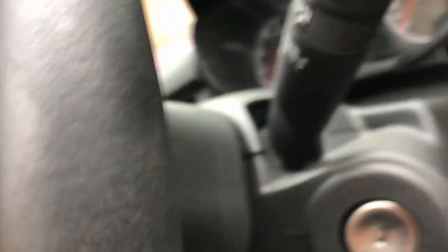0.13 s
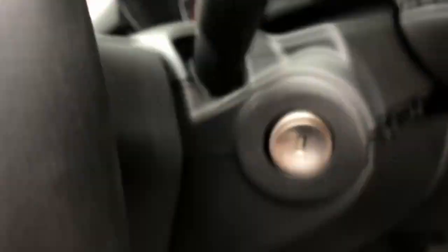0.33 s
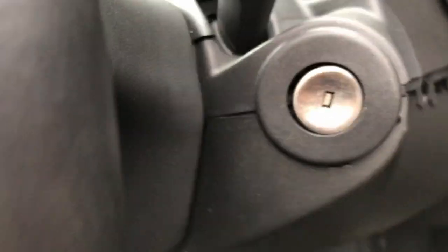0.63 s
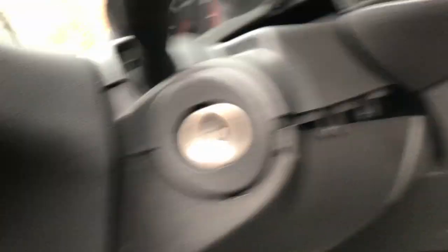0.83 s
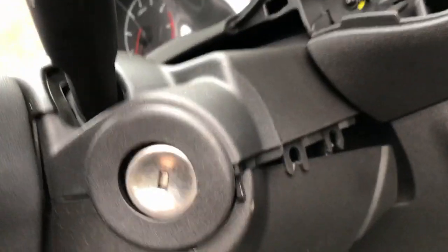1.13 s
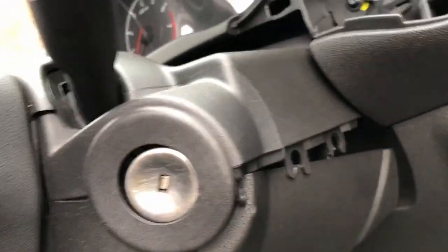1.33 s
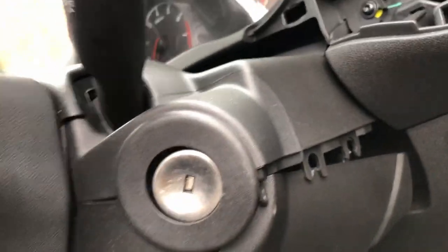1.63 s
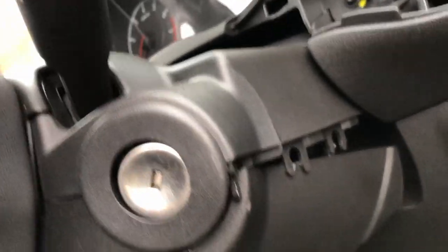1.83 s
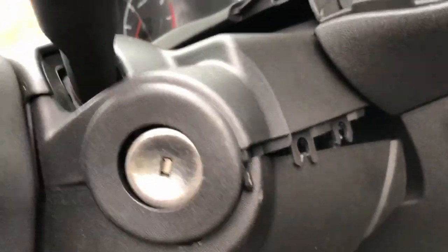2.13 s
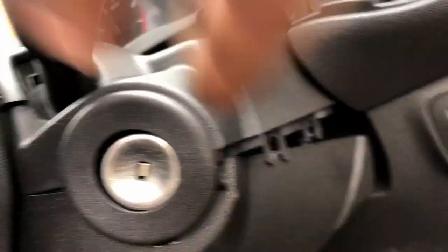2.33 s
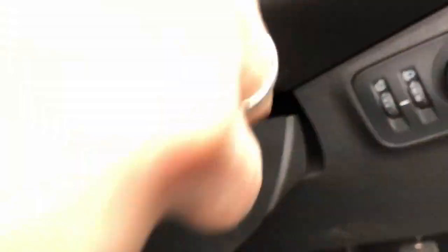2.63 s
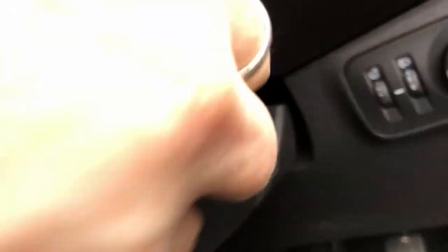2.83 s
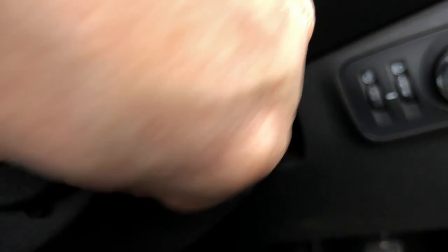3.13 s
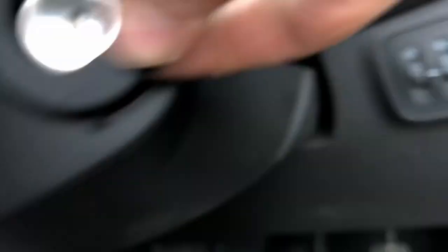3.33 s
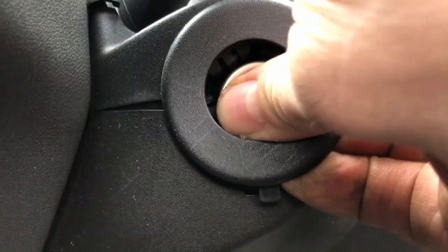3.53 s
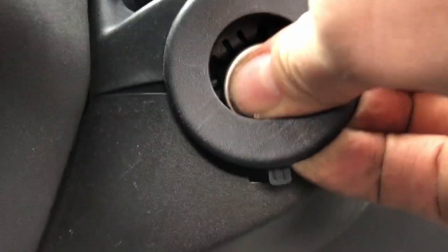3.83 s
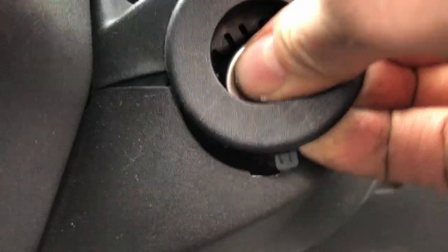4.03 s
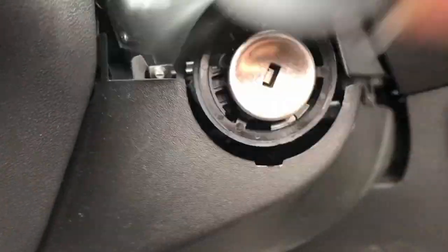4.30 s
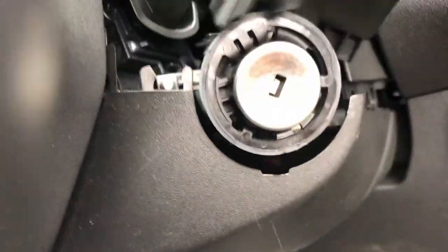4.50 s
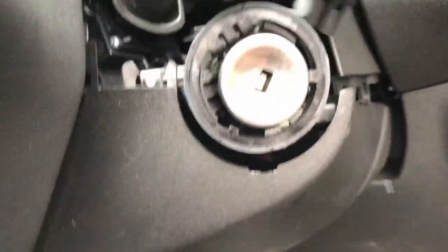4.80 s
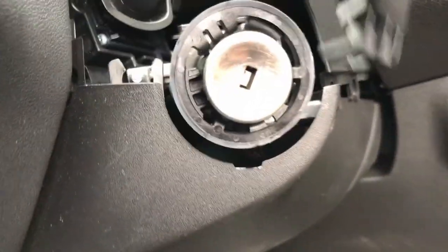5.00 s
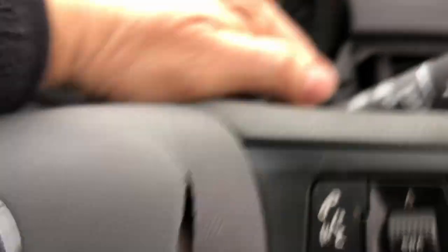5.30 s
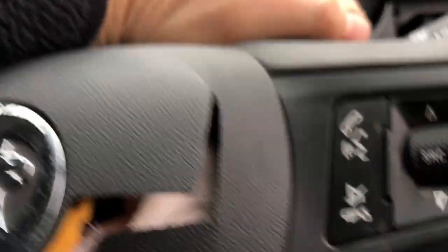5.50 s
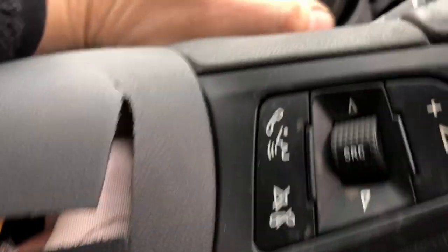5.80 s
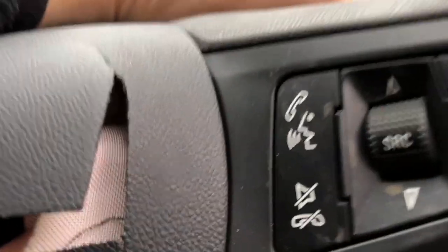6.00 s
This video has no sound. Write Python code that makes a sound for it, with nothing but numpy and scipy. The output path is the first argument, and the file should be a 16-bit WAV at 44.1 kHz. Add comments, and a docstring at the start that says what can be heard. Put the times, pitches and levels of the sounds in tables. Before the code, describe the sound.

Inside a parked car, plastic trim rubs, bounces and snaps off the steering column in sharp close clacks, ending in heavy hollow knocks.

```python
"""Inside a parked car, a hand prises the plastic bezel off the ignition lock and lifts the column shroud.
Catches snap and loose panels knock: each blow is a chirping bending wave with modes, rattle and cabin boom.
Fingers, sleeve and panel edges rub as shaped slip noise; narrow bands of it give short rubs and low hums.
Tugs shudder as a low sine, a thin whine is tinted noise.
The close hand-held microphone adds grip bumps and overloads on the hardest snaps."""
import sys
import numpy as np
from scipy import signal
from scipy.fft import rfft, irfft
from scipy.io import wavfile
from scipy.ndimage import uniform_filter1d

SR = 44100
rng = np.random.default_rng(int(sys.argv[2]) if len(sys.argv) > 2 else 0)


def int16_out(signal):
    """Quantize to a 16-bit WAV file."""
    q = np.round(np.clip(np.atleast_2d(signal).T, -1, 1) * 32767)
    wavfile.write(sys.argv[1], SR, q.astype(np.int16))


N = 271215  # samples

# Still cabin air: f/Hz, level/dB
AIR_COLOUR = [(20, -16), (40, -11.5), (68, 7.5), (100, -5.5), (170, -10.5), (300, -18.5), (700, -19),
              (1500, -26.5), (4000, -37), (9000, -41), (16000, -45)]
AIR_RMS_DB = -53.5

# Hand strokes over trim: t of firmest moment/s, swell/s, release/s, fingers before trim gain/dB, sleeve likewise/dB
STROKES = [(0, .05, 0.13605, -58, -63), (.227, .02, .08, -43.5, -56), (.41, 0.04425, 0.074, -48.5, -48.5),
           (0.596, 0.095, 0.043, -49.5, -45.5), (0.778, 0.15, 0.073, -51, -50),
           (.83, 0.12, 0.031, -62.5, -48.5), (1.05, 0.26, 0.39, -59.5, -59), (1.42, .3, .4, -70, -66.5),
           (1.852, 0.2276, 0.0438, -62.5, -51.5), (1.99, .2, 0.2, -67, -59), (2.4, 0.21, 0.22, -64, -58),
           (2.52, 0.14, 0.19, -50, -51), (2.609, 0.063, 0.082, -47.5, -46), (2.72, 0.29, 0.14, -47, -53.5),
           (2.851, 0.03413, .12, -47, -56), (3.02, 0.08724, 0.65, -50.5, -55),
           (3.254, 0.041, 0.11, -46, -46.5), (3.386, 0.14455, 0.08, -47.5, -40.5),
           (3.47, 0.11, 0.024, -71, -54), (3.68, 0.045, 0.26, -51.5, -68.5), (3.92, 0.15, 0.17, -58, -65.5),
           (4.16, 0.13865, .25, -53, -66.5), (4.48, 0.39, 0.46, -51, -51), (4.63, 0.18, 0.11, -62.5, -61),
           (5.299, 0.02076, 0.33, -47, -54), (5.619, 0.13, .25, -48.5, -53.5),
           (5.93, 0.10133, 0.1412, -51.5, -50.5), (6.07, 0.13, 0.1398, -48, -44)]
# Fingers on hollow trim, sleeve hiss: f/Hz, level/dB
FINGER_COLOUR = [(60, -6), (170, 7), (330, 0), (470, -1), (560, 8), (700, 0), (920, 1), (1300, -6.5),
                 (2200, -14), (5000, -48.5)]
SLEEVE_COLOUR = [(300, -14.5), (1000, 6), (2500, 4), (4500, 5), (7500, 0.5), (10000, -4), (13000, -13.5),
                 (16000, -21)]
STROKE_DROP_DB, STROKE_SHAPE = 21, 1.15  # fall over one swell or release time; roundness of the top
REST_FINGERS_DB, REST_SLEEVE_DB = -74.5, -73  # floor between strokes, before trim gain

# Dry panel-edge scrapes, then short narrow-band rubs and low hums (127 Hz at 3.08 s is cabin boom):
# t/s, length/s, rms before taper/dB, resonance f/Hz
SCRAPES = [(.214, 0.028, -52, 3561), (.265, 0.032, -56.5, 3754), (.527, 0.095, -48.5, 1283),
           (.748, 0.052, -40, 9140), (1.276, 0.029, -52.5, 6760), (2.002, 0.02474, -42.5, 1357),
           (2.073, .026, -42, 1080), (4.35, .059, -18.5, 702), (4.433, 0.011, -28.5, 2291)]
NARROW_RUBS = [(2.59, .12, -47, 582), (2.69, .07, -51, 920), (2.831, 0.04472, -46.5, 594),
               (2.99, .025, -49, 550), (3.08, 0.12, -43.5, 127.5), (3.186, 0.04, -50.5, 580),
               (3.35, 0.06172, -48, 1013), (3.496, 0.041, -52, 192), (3.655, .092, -54, 526),
               (3.697, 0.12028, -53, 239.9)]
# Slip noise of both: f/Hz, level/dB
SCRAPE_COLOUR = [(150, 4.5), (500, 1.5), (1000, 2), (1450, 1), (2200, -4.5), (4000, -0.5), (6500, -4),
                 (10000, -13), (16000, -22)]
SCRAPE_Q, SCRAPE_RING_DB = 5.5, 14.5
NARROW_WIDTH_HZ, NARROW_RING_DB = 65, 31.5
SCRAPE_BASS_RATIO = 6  # bass is cut this many times below the resonance

# Blows, for each part in turn: t/s, relative strength/dB, hardness/dB per octave above PIVOT_HZ,
# weight/dB per octave below it, ring t60 at 1 kHz/s
RIM_TAPS = [(.345, -12, 6, 6, .022), (2.0572, 14, -7, -1.5, 0.024), (2.0735, 0, 3, 0, 0.033),
            (4.4675, 15, -5, -4, 0.025), (4.476, -10, 10, 10, 0.039), (5.0235, 10.5, 3.5, 3.5, 0.042),
            (5.324, 15.5, -7.5, -0.5, 0.031), (5.419, 0, 5, 2, 0.076), (5.51, 1, -9, -3.5, 0.0315),
            (5.557, 13, -4, 0.5, 0.052), (5.583, 0.5, 4.5, 2.5, 0.18), (5.684, 1.5, 4, 4, 0.058),
            (5.731, 0, 1, 4.5, .04), (6.0312, 19, -4, 0.5, 0.034), (6.0958, 32, 4, -15, 0.059)]  # stiff shroud rim clacks on its seat
GRIP_BUMPS = [(0.358, -28, 1.2, 7.5, 0.031), (0.411, -10.5, -1.0, 3.4, 0.02666),
              (0.604, -13, 7, 0.4, 0.0386), (0.751, 5, 1.9, -5, 0.057), (0.847, -0.1674, -3, -1.5, 0.00796)]  # grip shifts on the microphone body
COVER_BOUNCES = [(1.1615, 10.5, 2.5, 0, 0.089), (1.189, 32, -1.3, -4.5, .031), (1.2045, 14, 3, -0.5, 0.056),
                 (1.357, 8.5, -1.5, .5, 0.028), (1.365, 10.5, -1, -3.6, 0.05),
                 (1.3925, 15, -1, -1.5, 0.028), (1.444, 6.5, -2.5, 0, 0.046), (1.504, 2.5, -3, 0.5, 0.027),
                 (1.518, -0.5, -2.5, 1, 0.039), (1.557, -4, 0, 1.3, .045), (1.592, -6, -2, 1, .025),
                 (1.623, -17.5, 2, 4.5, 0.089)]  # loose upper cover drops back and bounces to rest
BEZEL_SNAPS = [(2.489, -3.2, 0.7, 5, 0.1), (2.917, -4.5, -3.5, 1, 0.032), (2.998, -4, -8.5, 3.1, 0.064),
               (3.039, 3, -1.4478, 0.5, 0.084), (3.845, -6, -1.4, 5.5, 0.024), (3.977, -4, -4, -0.5, 0.099),
               (4.2405, 31, -4.5, -2.5, 0.039), (4.3115, 9.5, 0.4, -5.5, 0.327),
               (4.3348, 30, 3, -6.5, 0.031), (4.352, 20.5, 2.4, 0.5, 0.0734),
               (4.357, 34.5, -2.5, -0.5, 0.058), (4.3748, 15, 6.5, -1, 0.0085),
               (4.381, 20.5, 3.9, 1.5, 0.019), (4.3915, 14.5, 5, 0, 0.031), (4.3983, 28.5, 2, -9, 0.021)]  # bezel strains, lets go all round, scrapes off the lock
CATCH_SNAPS = [(3.0618, 31, -1.0, -5.5, 0.034), (3.2735, 0.1, 0.9, 3.5, 0.044)]  # stiff catch under the bezel is levered free, ticks once more
SHROUD_KNOCKS = [(4.418, 16.2, -3.4, -5, 0.11), (5.7815, 7.7, 2.265, -3, 0.063), (5.7875, 21, 1.8, -2, 0.1),
                 (5.8005, 29, 0.38, 0.5, 0.073), (6.1092, 32.857, -0.76, -1, 0.1),
                 (6.1335, 30.7, -1.2, -12.5, .19)]  # shroud halves knock together and pull apart
CLIP_TICKS = [(4.562, 7, -4, 2.4, 0.065), (4.595, -1.5, -3.2, 3, 0.075), (4.7693, 17, 1.25, -3.5, 0.026),
              (4.8415, 0.5, 7.5, 7, 0.038), (4.8585, -17.5, 10, -4, 0.027), (4.866, -5.3, 3.5, 2.5, 0.13),
              (5.36, 7.5, -10.5, -9, 0.032), (5.4355, 4, -3.5, -2.5, 0.032)]  # small stiff clips flick and chatter on the column
PIVOT_HZ, WEIGHT_OCTAVES = 840, 3.3

# Part resonances: f/Hz, width/Hz, level over plain panel before band levelling/dB
GRIP_MODES = [(68.49, 81.1, 1.716)]
COVER_MODES = [(205.5, 42.1, 14), (266, 113, 10), (416.3, 190, 6), (1176.6, 387, 3.5), (2734.6, 404, 2),
               (6448, 2600, 12)]
BEZEL_MODES = [(330, 26, 7), (536, 67, 19.5), (570, 30, 12), (918.6, 66, 11), (1186, 75, 1),
               (1837.8, 110, 6.5), (2093.5, 71, -2.5), (3000, 190, 1.5), (3578, 450, 1), (7619, 900, -11)]
CATCH_MODES = [(307.8, 32, 5.5), (520.57, 44, 12.5), (567, 40, 13.5), (916.4, 65, 8.5), (2178.8, 110, 15),
               (3124.8, 350, 9.5), (3704, 300, 7), (4555, 430, 10), (5651.2, 300, 7.5), (8490, 230, 6.5)]
SHROUD_MODES = [(176, 24, 20.2), (348, 28, 2.2), (500, 93, 10.336), (668.44, 36, 9.6), (1258, 220, 0.87),
                (1838, 1200, 1), (2217.1, 180, 1.3), (5830, 1900, 0.89)]  # also used by the rim
CLIP_MODES = [(307, 15, 6.9), (1396, 170, 13), (2768.3, 26.43, 1.677), (3820, 190, 12), (4078.5, 234, 6.94),
              (5630, 390, 5.4), (9600, 1200, 12)]

# Radiation of each part under an ordinary blow: f/Hz, relative level/dB
RIM_COLOUR = [(110, -9.5), (250, -13.5), (600, 0), (1700, -11.5), (4300, -17.5), (8500, -38), (14000, -49)]
GRIP_COLOUR = [(110, 20.5), (250, 14), (600, -3), (1700, -13.5), (4300, -24), (8500, -31), (14000, -41)]
COVER_COLOUR = [(110, 9), (250, 13), (600, -1), (1700, -22), (4300, -27), (8500, -34.5), (14000, -50)]
BEZEL_COLOUR = [(110, -7.1), (250, -5), (600, 0.5), (1700, -2.5), (4300, -14), (8500, -20.5), (14000, -37)]
CATCH_COLOUR = [(110, -6), (250, -9), (600, -2), (1700, -2.5), (4300, -1.7), (8500, -8.5), (14000, -22)]
SHROUD_COLOUR = [(110, -9.5), (250, 9.5), (600, 0.5), (1700, -9), (4300, -10), (8500, -19.5),
                 (14000, -28.5)]
CLIP_COLOUR = [(110, -7.5), (250, 4), (600, 0.0), (1700, -3), (4300, -9), (8500, -17.5), (14000, -42)]
# Centres of the bands in which a panel is levelled: f/Hz
BANDS_HZ = [110, 250, 600, 1700, 4300, 8500, 14000]
# Cabin boom: f/Hz, level/dB
BOOM_COLOUR = [(30, -22), (70, 0), (120, 4.5), (190, 5), (300, -0.5), (450, -13), (900, -24), (3000, -49),
               (16000, -86.5)]
# Cabin decay: f/Hz, t60/s
CABIN_T60 = [(70, 0.46), (180, 0.4), (400, 0.16), (2000, .09), (12000, 0.14)]
BLOW_SAMPLES = 2 ** 14
TYPICAL_T60_S, RATTLE_DB_PER_DOUBLING = .04, 1  # a looser part rings longer and rattles more
BOOM_HZ, BOOM_BUILD_S = 172.07, 0.022  # boom follows the blow's level at BOOM_HZ

# Deep shudders after the firmest grips and tugs: t/s, peak/dB
SHUDDERS = [(2.47, -41), (3.074, -36), (5.808, -29.5), (5.931, -32)]
SHUDDER_HZ, SHUDDER_SWELL_S = 69.195, 0.048

# Thin faint whine, one row: t/s, length/s, starting level/dB, fade over length/dB
WHINE = (3.5, 0.85, -67, 12)
# Its two narrow tones: f/Hz, level/dB
WHINE_COLOUR = [(1500, -40), (1820, -14), (1950, 1), (2080, -17), (2400, -36), (3400, -32), (3760, -11),
                (4100, -34), (6000, -60)]

EDGE_HZ = 15650  # top of the passband


def from_db(db):
    """Decibels to gain."""
    return 10 ** (np.asarray(db) / 20)


def unit(x):
    """Scale to rms 1."""
    return x / np.sqrt(np.mean(x ** 2) + 1e-20)


def read(points, hz):
    """Interpolate (Hz, value) points on a log-frequency axis."""
    f, value = np.transpose(points)
    return np.interp(np.log(hz + 1), np.log(f + 1), value)


def add(mix, s, sound):
    """Mix a sound in at a time in seconds."""
    part = mix[max(round(s * SR), 0):][:len(sound)]
    part += sound[:len(part)]


def tint(x, colour):
    """Filter by a (Hz, dB) spectrum."""
    hz = np.fft.rfftfreq(len(x), 1 / SR)
    return irfft(rfft(x) * from_db(read(colour, hz)), len(x))


def causal(db):
    """Minimum-phase response with this gain in dB: no sound before its cause."""
    log_gain = np.log(from_db(np.r_[db, db[-2:0:-1]]))
    return np.exp(np.conj(signal.hilbert(log_gain)))[:len(db)]


def still_air():
    """Cabin air: steady tinted noise."""
    return from_db(AIR_RMS_DB) * unit(tint(rng.standard_normal(N), AIR_COLOUR))


def friction(slips_per_s, spread_db, smooth):
    """Countless tiny slips of uneven size over a smooth hiss."""
    sizes = from_db(spread_db * np.minimum(rng.exponential(1, N), 4)) * rng.standard_normal(N)
    slips = unit(sizes * (rng.random(N) < slips_per_s / SR))
    return unit(slips + smooth * rng.standard_normal(N))


def swell(peak_s, rise_s, fall_s):
    """Gain of a gesture that grows to its peak and lets go."""
    t = np.arange(N) / SR - peak_s
    return from_db(-STROKE_DROP_DB * np.maximum(-t / rise_s, t / fall_s) ** STROKE_SHAPE)


def rubbing(finger_db, sleeve_db, waver_db):
    """Fingers drag over hollow trim while the sleeve brushes past; pressure wavers at random."""
    finger_power, sleeve_power = from_db(REST_FINGERS_DB) ** 2, from_db(REST_SLEEVE_DB) ** 2
    for s, rise_s, fall_s, press_db, hiss_db in STROKES:
        power = swell(s, rise_s, fall_s) ** 2
        finger_power = finger_power + power * from_db(press_db) ** 2
        sleeve_power = sleeve_power + power * from_db(hiss_db) ** 2
    slow_noise = uniform_filter1d(uniform_filter1d(rng.standard_normal(N), size=700), size=400)
    pressure_db = waver_db * unit(slow_noise)
    skin = friction(slips_per_s=900, spread_db=2, smooth=1)
    cloth = friction(slips_per_s=4000, spread_db=2.5, smooth=2.0)
    drag = unit(tint(skin, FINGER_COLOUR)) * np.sqrt(finger_power)
    brush = unit(tint(cloth, SLEEVE_COLOUR)) * np.sqrt(sleeve_power)
    # the sleeve follows half the waver
    return drag * from_db(finger_db + pressure_db) + brush * from_db(sleeve_db + pressure_db / 2)


def resonant_strokes(rows, width_at, ring_db, slips_per_s, spread_db, smooth):
    """Slip noise in short tapered strokes, each through its own resonance."""
    slips = tint(friction(slips_per_s, spread_db, smooth), SCRAPE_COLOUR)
    out = np.zeros(N)
    for s, length_s, db, centre_hz in rows:
        stroke = slips[round(s * SR):][:round(length_s * SR)]
        peak = signal.iirpeak(centre_hz, centre_hz / width_at(centre_hz), SR)
        ring = signal.lfilter(*peak, stroke)
        bass_cut = signal.butter(1, centre_hz / SCRAPE_BASS_RATIO, "high", fs=SR)
        rub = signal.lfilter(*bass_cut, stroke)
        taper = signal.windows.tukey(len(stroke), .3)
        add(out, s, from_db(db) * unit(rub + from_db(ring_db) * ring) * taper)
    return out


def edge_scrapes():
    """Panel edges scrape dry: slip noise through a resonance of constant Q."""
    return resonant_strokes(SCRAPES, lambda hz: hz / SCRAPE_Q, SCRAPE_RING_DB,
                            slips_per_s=900, spread_db=1.0, smooth=0.86)


def dying_noise(t60_at):
    """Spectrum of dense unit-energy echoes, each frequency dying at its own speed."""
    hz, t, z = signal.stft(rng.standard_normal(BLOW_SAMPLES), SR, nperseg=128, noverlap=96)
    fade = from_db(-60 * t / t60_at(hz)[:, None])
    fade /= np.sqrt(np.mean(fade ** 2, 1, keepdims=True) * BLOW_SAMPLES)
    echoes = signal.istft(z * fade, SR, nperseg=128, noverlap=96)[1]
    return rfft(echoes[:BLOW_SAMPLES])


def cabin_echoes():
    """Spectrum of diffuse echoes that decay at the cabin's t60."""
    return dying_noise(lambda f: read(CABIN_T60, f))


def reflections(x):
    """Glass and dashboard return a faint, short wash."""
    return signal.oaconvolve(x, irfft(cabin_echoes()))[:N]


def blows(rows, modes, colour, travel_ms, rattle_db, damping, boom_db):
    """A bending wave crosses a panel (travel at 1 kHz); edges scatter it, modes ring, the cabin booms."""
    hz, t = np.fft.rfftfreq(BLOW_SAMPLES, 1 / SR), np.arange(BLOW_SAMPLES) / SR
    body = 1 + sum(from_db(db) / (1 + 2j * (hz - f) / width) for f, width, db in modes)
    bands = np.array([read(list(zip(BANDS_HZ, one)), hz) for one in np.eye(len(BANDS_HZ))])
    boom_colour = causal(read(BOOM_COLOUR, hz))
    build_up = 1 - np.exp(-(t / BOOM_BUILD_S) ** 2)
    octaves = np.log2(np.clip(hz, 1, BANDS_HZ[-1]) / PIVOT_HZ)
    # higher bending waves run faster: each click chirps downwards
    wave = np.exp(-4j * np.pi * travel_ms * np.sqrt(hz / 1000))
    first_arrival_s = travel_ms / 4000  # delay at 16 kHz
    out = np.zeros(N)
    for s, strength_db, hardness, weight, t60_s in rows:
        # a hard contact lifts the treble, a heavy one the bass
        force_db = read(colour, hz) + strength_db
        force_db += hardness * np.maximum(octaves, 0)
        force_db += weight * np.clip(-octaves, 0, WEIGHT_OCTAVES)
        scatter = dying_noise(lambda f: t60_s * (np.maximum(f, 300) / 1000) ** -damping)
        looseness_db = RATTLE_DB_PER_DOUBLING * np.log2(t60_s / TYPICAL_T60_S)
        panel = wave * body * (1 + from_db(rattle_db + looseness_db) * scatter)
        # level the panel per band so that the force sets the spectrum
        panel_db = 10 * np.log10(bands @ abs(panel) ** 2 / bands.sum(1))
        direct = irfft(panel * causal(force_db - panel_db @ bands))
        # low air modes build slowly and outlast the panel
        cabin = build_up * irfft(cabin_echoes() * boom_colour)
        boom_gain = from_db(np.interp(BOOM_HZ, hz, force_db) + boom_db)
        add(out, s - first_arrival_s, direct + boom_gain * cabin)
    return out


def rim_taps():
    """Stiff shroud rim clacks on its seat: shroud modes, little rattle."""
    return from_db(-2.0) * blows(RIM_TAPS, SHROUD_MODES, RIM_COLOUR, travel_ms=1.85,
                                 rattle_db=0.5, damping=.28, boom_db=5.5)


def grip_bumps():
    """Hand shifts on the microphone body: bassy blows, almost no cabin boom."""
    return blows(GRIP_BUMPS, GRIP_MODES, GRIP_COLOUR, travel_ms=2.91,
                 rattle_db=3.5, damping=0.1563, boom_db=-27)


def cover_bounces():
    """Loose upper cover bounces to rest: dull blows on broad modes."""
    return from_db(-2.0) * blows(COVER_BOUNCES, COVER_MODES, COVER_COLOUR, travel_ms=2.65,
                                 rattle_db=-2.0, damping=.06, boom_db=-10.5)


def shudders():
    """One low resonance swells and dies away after each tug."""
    out, t = np.zeros(N), np.arange(SR // 2) / SR
    u = t / SHUDDER_SWELL_S
    pulse = u ** 2 * np.exp(2 - 2 * u) * np.sin(2 * np.pi * SHUDDER_HZ * t)
    for s, db in SHUDDERS:
        add(out, s, from_db(db) * pulse)
    return out


def bezel_snaps():
    """Bezel lets go of the lock: sharp blows on midrange modes."""
    return from_db(-3.5) * blows(BEZEL_SNAPS, BEZEL_MODES, BEZEL_COLOUR, travel_ms=1.8,
                                 rattle_db=4.5, damping=.22, boom_db=-0.5)


def narrow_rubs():
    """Short narrow-band rubs and low hums: slip noise through a strong resonance of constant width."""
    return resonant_strokes(NARROW_RUBS, lambda hz: NARROW_WIDTH_HZ, NARROW_RING_DB,
                            slips_per_s=400, spread_db=2.0, smooth=0.34)


def catch_snaps():
    """Stiff catch springs free: bright blows on many modes."""
    return blows(CATCH_SNAPS, CATCH_MODES, CATCH_COLOUR, travel_ms=1.6,
                 rattle_db=-2.5, damping=0.13, boom_db=-0.5)


def whine():
    """Two narrow, unsteady tones from tinted noise come in quickly and fade."""
    s, length_s, db, fade_db = WHINE
    u = (np.arange(N) / SR - s) / length_s
    gate = np.clip(u / .06, 0, 1) * np.clip((1 - u) / .15, 0, 1)
    tones = unit(tint(rng.standard_normal(N), WHINE_COLOUR))
    return from_db(db - fade_db * np.clip(u, 0, 1)) * gate * tones


def shroud_knocks():
    """Shroud halves knock: blows with strong edge scatter, hence rattle."""
    return from_db(-1.0) * blows(SHROUD_KNOCKS, SHROUD_MODES, SHROUD_COLOUR, travel_ms=2.1,
                                 rattle_db=19, damping=.28, boom_db=-2.5)


def clip_ticks():
    """Small stiff clips chatter: blows on mostly high modes."""
    return from_db(-1.0) * blows(CLIP_TICKS, CLIP_MODES, CLIP_COLOUR, travel_ms=2.155,
                                 rattle_db=2.5, damping=0.33, boom_db=1.0)


def scene():
    """All parts, heard from beside the steering column."""
    air = still_air()
    hand = rubbing(finger_db=-0.5, sleeve_db=0.5, waver_db=3.3)
    trim = edge_scrapes() + rim_taps() + cover_bounces() + bezel_snaps()
    trim += narrow_rubs() + catch_snaps() + shroud_knocks() + clip_ticks()
    wash = from_db(-23.5) * reflections(trim)
    return (air + hand + trim + wash + grip_bumps() + shudders() + whine())[None]


def record(dry):
    """Overload flattens the hardest snaps at full scale; deepest bass and top treble are shed."""
    clipped = dry / (1 + dry ** 6) ** (1 / 6)
    lean = signal.sosfilt(signal.butter(3, 44, "high", fs=SR, output="sos"), clipped)
    treble_cut = signal.firwin(255, EDGE_HZ, window=("kaiser", 8), fs=SR)
    return signal.oaconvolve(lean, treble_cut[None], "same")


dry = scene()
out = record(dry)
int16_out(out)
```